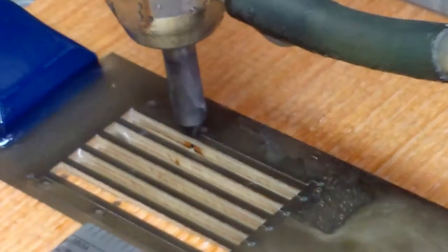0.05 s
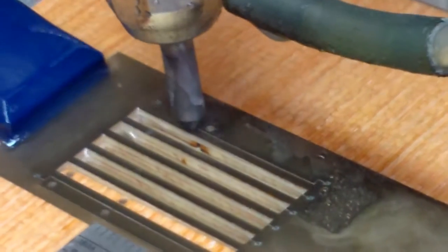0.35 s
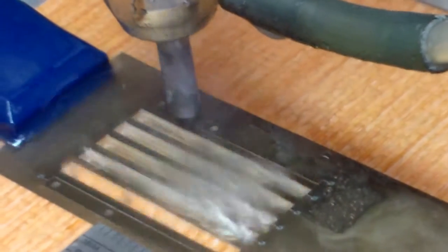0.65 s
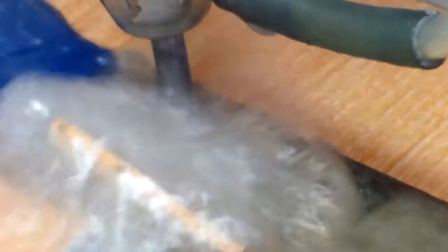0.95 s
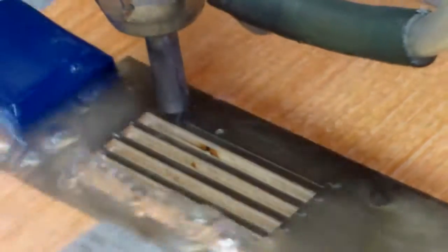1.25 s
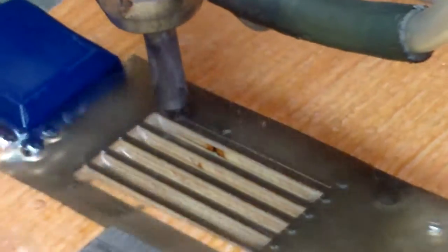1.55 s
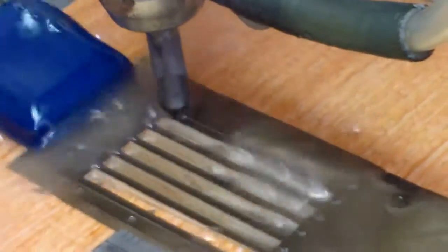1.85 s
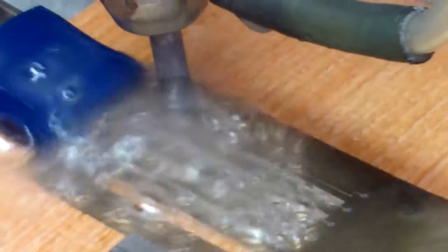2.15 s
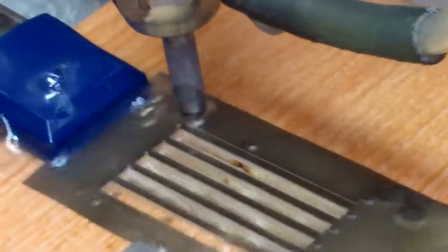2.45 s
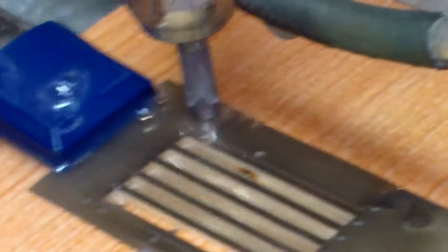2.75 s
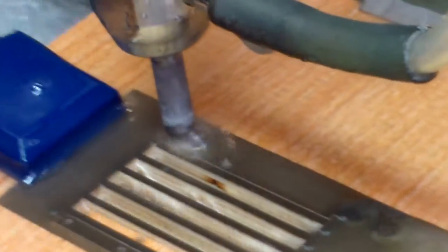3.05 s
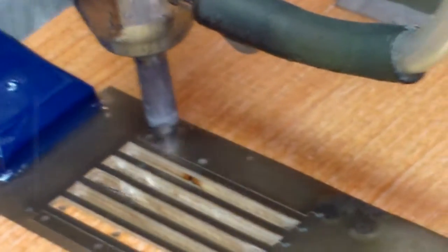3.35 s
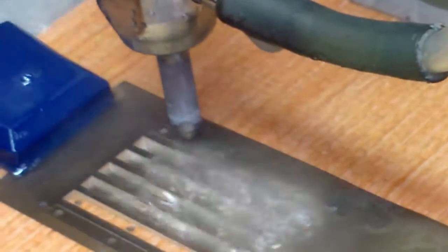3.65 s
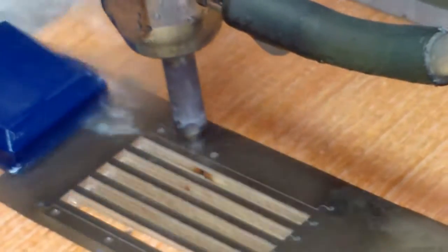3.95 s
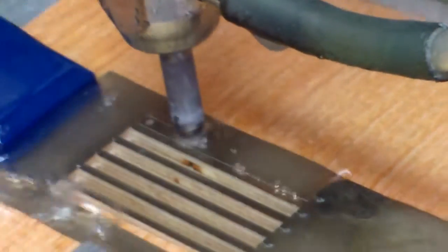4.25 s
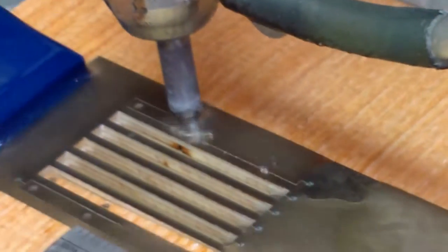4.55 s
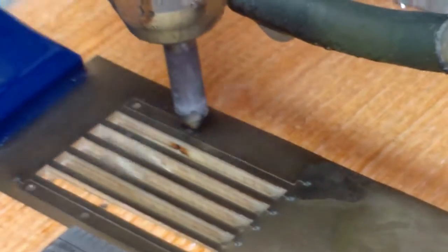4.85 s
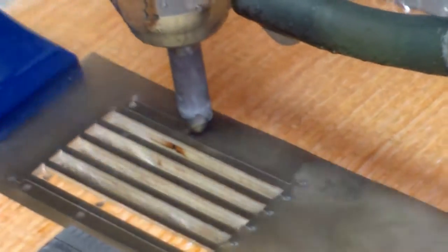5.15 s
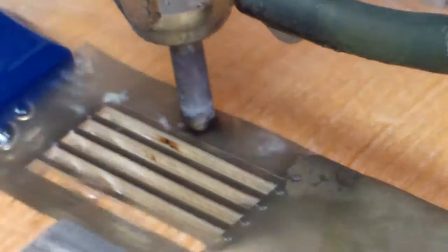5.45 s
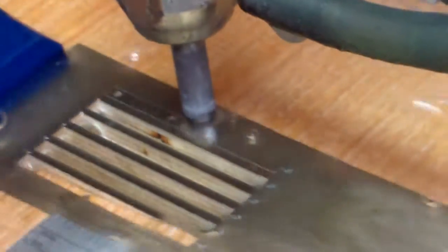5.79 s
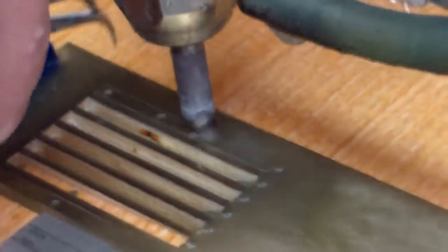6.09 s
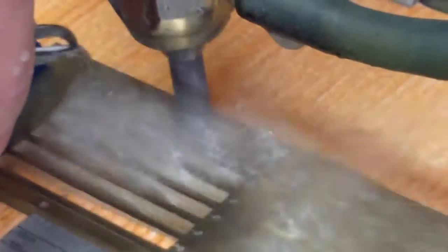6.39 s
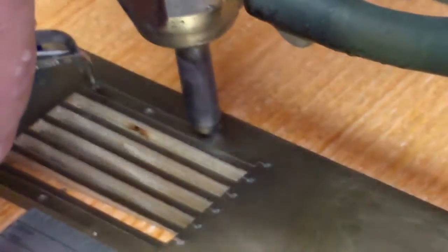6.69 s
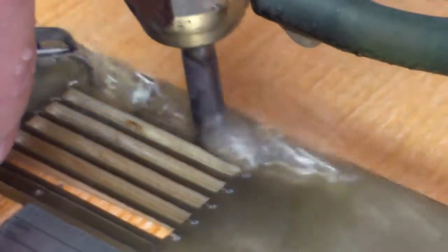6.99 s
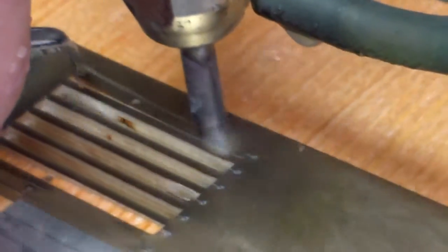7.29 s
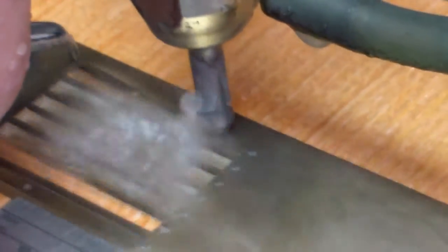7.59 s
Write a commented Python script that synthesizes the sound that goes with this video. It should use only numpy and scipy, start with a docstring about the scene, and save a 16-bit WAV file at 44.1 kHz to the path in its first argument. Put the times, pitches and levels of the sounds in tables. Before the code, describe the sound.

A water jet cuts a thin steel sheet, very close to one microphone in a workshop. From the start it gives a loud, bright hiss over pattering spray and a faint droning pump, and the overloaded microphone soon thumps and rumbles. From 0.6 seconds the hiss drops out, with shrill spits and a splash near 1 second as water washes hollowly through the slots. It returns around 1.6 seconds, then breaks off again from 1.9 to 2.5 amid spits and squirts. Whenever the jet weakens, it sounds dull and sputtery, with small glugs. A breathy falling whistle comes near 3.5 seconds. After more gaps and spits, the hiss is loudest at 4.6 seconds, with low thumps. A second whistle near 5.7 leads into a surge at 6.1. The hiss then sinks under splashing, squirts and spits before surging again at about 7.4 seconds.

```python
"""A water jet cuts slots in a thin steel sheet, close to one microphone that its hiss overloads.
From the start it hisses over pattering spray and a droning pump; the overloaded mic soon thumps.
From 0.6 s the hiss drops out over openings and spits at edges, while water squirts and glugs.
Whenever the jet is weak, water floods the cut and dulls it. The cut whistles near 3.5 s, the hiss
is loudest at 4.6 s, and after a second whistle near 5.7 s it surges twice more."""
import sys
import numpy as np
from scipy import signal
from scipy.fft import rfft, irfft, next_fast_len
from scipy.io import wavfile

SR = 44100
rng = np.random.default_rng(int(sys.argv[2]) if len(sys.argv) > 2 else 0)


def file_out(sig):
    """Save sig as 16-bit WAV at sys.argv[1]."""
    # one column per channel
    cols = np.atleast_2d(sig).T
    # limit, then scale
    lim = np.clip(cols, -1, 1)
    pcm = np.round(lim * 32767).astype(np.int16)
    wavfile.write(sys.argv[1], SR, pcm)


N = 340893
TIME = np.arange(N) / SR

# how hard the jet bites the sheet: time_s, level_db
JET_BITE = [(0, -4), (.25, 3.5), (.6, -1.5), (1.33, -7.5), (1.66, -0.5), (1.9, -6), (2.85, -6.5),
            (3.25, -3.5), (3.7, -9.5), (4.46, -6.5), (4.6, 9.5), (5.0, -11.5), (5.95, -8.5), (6.13, 3),
            (6.45, -15), (7.3, -13), (7.43, 3.5), (7.73, -1)]
# the tone of each steady noise: pitch_hz, level_db
DRY_HISS = [(100, -13.5), (1500, -17.5), (3500, -17), (5500, -14), (7500, -9.5), (10000, 0), (12000, 0.5),
            (14000, 0), (16000, -1)]  # a dry cut
WET_HISS = [(100, -22.5), (1500, -26), (3500, -10), (5000, -9.5), (6500, -3.5), (8700, 1.5), (11000, 2.5),
            (13500, 1.5), (16000, -10.5)]  # a flooded cut
DRAUGHT_TONE = [(20, 18.5), (70, -6), (300, -4.5), (1000, -24)]  # moving air
PUMP_TONE = [(25, 5), (80, 5), (200, -4), (400, 8.5), (700, -3), (1000, 0), (1300, -14), (1700, -39),
             (2500, -1), (4000, -10.5), (16000, -8)]  # the pump in the workshop
SPRAY_TONE = [(30, 0), (90, -2), (160, -1.5), (400, -4.5), (700, -5.5), (1200, -3), (1700, -3.5),
              (2600, -6), (4000, -12.5), (8000, -8), (16000, -24)]  # spray on the sheet
# pitches that the nozzle and its gap boost or weaken: pitch_hz, width_hz, gain_db
NOZZLE_BANDS = [(5860, 67, 1.5), (7190, 430, 5), (7970, 400, -2.5), (8700, 740, 10), (9156, 540, -10.5),
                (10530, 1540, 3.5), (11440, 530, -2), (12660, 470, 2)]
# pitches at which the finished slots ring: pitch_hz, width_hz, level_db
SLOT_RINGS = [(992, 98, 5.5), (1610, 130, 0.5)]
# echoes off the cutting head and table: delay_s, level_db
ECHOES = [(.0019, -31), (.0034, -28), (.0053, -38.5), (.0087, -17.5)]
# loud surges knock the overloaded microphone off centre: start_s, length_s, level_db
THUMPS = [(0.188, 0.043, -15.5), (0.415, 0.066, -28), (1.596, 0.15, -23.5), (2.342, 0.035, -16),
          (2.483, 0.083, -15), (2.979, 0.03, -13.5), (4.149, 0.044, -20), (4.525, 0.059, -8),
          (4.661, 0.027, -15), (4.752, 0.036, -16), (6.081, 0.04, -19), (6.13, 0.06, -17),
          (7.374, 0.16, -26.5)]
# the hiss drops out over an opening: start_s, length_s, depth_db
DROPOUTS = [(0.6, 0.15, 23), (0.78, 0.41, 30.5), (1.847, .61, 30.5), (3.721, 0.42, 14), (4.189, 0.076, 30),
            (4.276, 0.083, 7.5), (4.969, 0.11, 8.5), (5.328, 0.14, 11.5), (6.333, .525, 16.5),
            (7.007, 0.053, 25), (7.144, 0.022, 16), (7.663, 0.045, 18.5)]
# water runs through the slots: start_s, length_s, level_db
WASHES = [(.62, 0.14, -38.5), (.98, 0.42, -32.5), (1.91, .25, -33.5)]
# the jet catches an edge: start_s, length_s, level_db, pitch_hz
SPITS = [(.647, 0.018, -9.5, 9100), (.721, 0.048, -8, 8620), (1.187, 0.03, -9, 9110),
         (1.991, 0.034, -7, 9630), (2.105, 0.016, -22, 7300), (2.124, 0.062, -9.5, 9080),
         (2.34, 0.04, -4.5, 9400), (2.459, 0.088, -3, 9820), (2.57, 0.019, -6, 8070),
         (2.617, 0.013, -11.5, 6650), (2.68, 0.015, -11, 7100), (2.79, 0.023, -14.5, 7030),
         (4.123, 0.0086, -9.5, 6600), (4.149, 0.07, -5, 9000), (4.25, 0.0022, -19, 9200),
         (4.263, .035, -11.5, 9380), (4.315, .045, -12, 6980), (5.18, 0.021, -11.5, 7570),
         (5.376, .01, -11, 7310), (5.461, .014, -14, 6590), (5.535, .035, -14.5, 8470),
         (5.675, 0.034, -9.5, 9130), (6.694, 0.021, -8.5, 7250), (6.729, 0.021, -7.5, 7650),
         (6.776, 0.018, -12, 7330), (6.851, 0.015, -12.5, 6730), (6.872, 0.029, -11, 8260),
         (6.973, 0.01, -18, 7360), (6.995, .035, -13.5, 8100), (7.1, .03, -15, 8220),
         (7.177, 0.02, -14, 7240)]
# spray is thrown back over the sheet: start_s, length_s, level_db
SPLASHES = [(.68, 0.044, -38), (.95, 0.229, -23.5), (1.93, .17, -43), (2.31, 0.033, -27), (3.99, 0.16, -42),
            (6.49, .19, -26), (7.19, .14, -45)]
# water squirts out of the cut: start_s, length_s, level_db, pitch_hz
SQUIRTS = [(.772, 0.021, -18, 6070), (2.112, 0.054, -21, 4400), (2.625, 0.03, -24, 3300),
           (2.69, 0.05, -26, 3410), (4.085, 0.043, -24, 3000), (4.335, 0.047, -19, 4960),
           (5.05, 0.089, -27, 2355), (5.475, 0.042, -24.5, 3250), (6.533, 0.011, -20, 2130),
           (6.705, 0.024, -27, 2460), (6.785, 0.016, -23.5, 5030), (6.89, 0.031, -26, 4570)]
# air pockets glug: start_s, length_s, level_db, pitch_hz
GLUGS = [(.98, 0.052, -31, 458), (2.428, 0.015, -32, 1620), (3.59, 0.058, -37, 1190),
         (4.095, 0.028, -32, 1700), (5.075, 0.033, -30, 1340), (5.295, 0.035, -31.5, 339),
         (6.47, 0.029, -30, 374), (6.505, 0.022, -26.5, 995), (6.655, 0.011, -26, 880),
         (7.2, 0.032, -25, 341), (7.235, .1, -30.5, 380)]
# the cut whistles: start_s, length_s, level_db, pitch_hz
WHISTLES = [(3.45, 0.11, -23.5, 5050), (5.74, .28, -26, 6940)]


def from_db(db):
    """Turn decibels into a number to multiply by."""
    return 10 ** (np.asarray(db) / 20)


def unit_power(x):
    """Scale a signal so its average power is 1."""
    return x / np.sqrt(np.mean(x ** 2) + 1e-20)


def noise(tone):
    """Steady noise shaped by a tone table."""
    hz, db = np.transpose(tone)
    size = next_fast_len(N)
    pitches = np.maximum(np.fft.rfftfreq(size, 1 / SR), 1)
    gain = from_db(np.interp(np.log(pitches), np.log(hz), db))
    return unit_power(irfft(rfft(rng.standard_normal(size)) * gain, size)[:N])


def drift(rate_hz):
    """A random wobble of about size 1, mostly slower than the given rate."""
    smoothing = signal.butter(2, rate_hz, fs=SR, output="sos")
    return unit_power(signal.sosfilt(smoothing, rng.standard_normal(N + SR))[SR:])


def swells(rows, rise_s=0.019, drain_s=0.0073):
    """The strength of moving water: each row rises, holds and drains away."""
    total = np.zeros(N)
    for start, length, db in rows:
        rise = 1 - np.exp(-np.maximum(TIME - start, 0) / rise_s)
        drain = np.exp(-np.clip((TIME - start - length) / drain_s, 0, 20))
        total += from_db(db) * rise * drain
    return total


def bursts(rows, glide, width, rise_s, fade_s):
    """Sliding bands of noise and their strength; glide is end pitch / start pitch, width a share of it."""
    sound, strength = np.zeros(N), np.zeros(N)
    for start, length, db, hz in rows:
        white = rng.standard_normal((2, SR // 2))
        first = int(start * SR)
        t = TIME[:min(SR // 2, N - first)]
        smoothing = signal.butter(2, np.clip(width * hz, 10, SR / 4), fs=SR, output="sos")
        a, b = signal.sosfilt(smoothing, white)[:, :len(t)]
        pitch_hz = hz * glide ** (np.minimum(t / length, 1) - .5)
        phase = 2 * np.pi * np.cumsum(pitch_hz) / SR
        shape = from_db(db) * (1 - np.exp(-t / rise_s)) * np.exp(-np.maximum(t - length, 0) / fade_s)
        sound[first:first + len(t)] += shape * unit_power(a * np.cos(phase) + b * np.sin(phase))
        strength[first:first + len(t)] += shape
    return sound, strength


def eddies(x, depth_db, span_hz, life_s, fall_hz_per_s):
    """Brief swirls boost or weaken random pitches, sliding down at the given speed."""
    frames = dict(fs=SR, nperseg=384, noverlap=288)
    hz, times, cells = signal.stft(x, **frames)  # a grid of pitch against time
    per_hz = np.fft.fftfreq(len(hz), hz[1])[:, None]
    per_s = np.fft.fftfreq(len(times), times[1])
    blur = np.exp(-(per_hz * span_hz) ** 2 - ((per_s - fall_hz_per_s * per_hz) * life_s) ** 2)
    swirls = unit_power(np.fft.ifft2(np.fft.fft2(rng.standard_normal(cells.shape)) * blur).real)
    gain = unit_power(from_db(depth_db * np.clip(swirls, -2, 2)))
    return signal.istft(cells * gain, **frames)[1][:N]


def sputter(rate_hz, fade_s, spread_db):
    """Blobs of water hit at random, each a sharp jump in strength that quickly fades."""
    hits = rng.random(N) < rate_hz / SR
    sizes = from_db(spread_db * np.clip(rng.standard_normal(N), -2, 2))
    return unit_power(signal.lfilter([1], [1, -np.exp(-1 / (fade_s * SR))], hits * sizes + 1e-18))


def bite(fall_s=0.031, return_s=0.035):
    """The jet's level in dB: it fades quickly over each opening and comes back about as quickly."""
    db = np.interp(TIME, *np.transpose(JET_BITE))
    for start, length, depth_db in DROPOUTS:
        entering = np.clip((TIME - start) / fall_s, 0, 1)
        leaving = np.clip((start + length - TIME) / return_s + 1, 0, 1)
        db -= depth_db * entering * leaving
    return db


def jet(bite_db, splash, max_flood=0.6, half_flood_db=-6.5):
    """A dry cut hisses bright and even; a weak jet lets it flood, so it dulls, surges and sputters."""
    flood = np.clip(max_flood / (1 + np.exp(bite_db - half_flood_db)), 0.01, 1)
    dry = eddies(noise(DRY_HISS), depth_db=4, span_hz=547, life_s=0.033, fall_hz_per_s=1900)
    wet = eddies(noise(WET_HISS), depth_db=4, span_hz=500, life_s=0.022, fall_hz_per_s=12000)
    wet *= unit_power(1.3 + sputter(rate_hz=130, fade_s=0.004, spread_db=3))
    flutter = from_db((0.12 + flood) * drift(120) + 2.9 * flood * drift(9.3))
    hiss = from_db(bite_db - 1) * (np.sqrt(1 - flood) * dry + np.sqrt(flood) * wet)
    singing = from_db(1.76 * bite_db - 6.5) * np.sqrt(flood) * sizzle()
    splash_fizz = from_db(-9) * splash * wet
    return flutter * (hiss + singing + splash_fizz)


def sizzle(pitch_hz=6190, wander_octaves=0.14, wander_hz=10, width_hz=350, surge_db=3):
    """The water-filled gap sings with a wandering pitch and strength."""
    phase = 2 * np.pi * np.cumsum(pitch_hz * 2 ** (wander_octaves * drift(wander_hz))) / SR
    band = drift(width_hz) * np.cos(phase) + drift(width_hz) * np.sin(phase)
    return unit_power(band * from_db(surge_db * drift(wander_hz)))


def nozzle(x):
    """The gap between nozzle and sheet boosts some pitches and weakens others."""
    for hz, width_hz, db in NOZZLE_BANDS:
        gain = from_db(db / 2)
        tuning = -2 * np.cos(2 * np.pi * hz / SR)
        width = np.tan(np.pi * width_hz / SR)
        x = signal.lfilter([1 + width * gain, tuning, 1 - width * gain],
                           [1 + width / gain, tuning, 1 - width / gain], x)
    return x


def draught(bite_db, growth=3.4, full_at_db=2.5):
    """Air dragged along by the jet rumbles, growing much faster than the hiss, up to a limit."""
    return from_db(growth * np.minimum(bite_db, full_at_db) - 25.5) * noise(DRAUGHT_TONE)


def pump(level_db=-39.5):
    """The pump drones steadily in the workshop behind."""
    return from_db(level_db) * noise(PUMP_TONE)


def spray(splash, patter_db=-36):
    """Spray patters on the sheet all the time, harder with each splash."""
    rush = eddies(noise(SPRAY_TONE), depth_db=2.5, span_hz=300, life_s=0.013, fall_hz_per_s=0)
    drops = unit_power(1 + sputter(rate_hz=360, fade_s=0.011, spread_db=12))
    return (from_db(patter_db) + splash) * rush * drops


def slots(trickle_db=-44.5):
    """The finished slots ring hollow as water trickles or washes through."""
    flow = rng.standard_normal(N)
    ring = np.zeros(N)
    for hz, width_hz, db in SLOT_RINGS:
        band = signal.iirpeak(hz, hz / width_hz, fs=SR)
        ring += from_db(db) * unit_power(signal.lfilter(*band, flow))
    return (from_db(trickle_db) + swells(WASHES)) * unit_power(ring)


def room(x, tail_db=-15.5, tail_s=0.16):
    """Nearby surfaces add quick echoes; the workshop adds a faint tail."""
    response = rng.standard_normal(SR // 2) * from_db(-60 * TIME[:SR // 2] / tail_s)
    response *= from_db(tail_db) / np.linalg.norm(response)
    response[0] = 1  # the direct sound
    for delay, db in ECHOES:
        response[int(delay * SR)] += from_db(db)
    return signal.fftconvolve(x, response)[:N]


def overload(x, ceiling=0.69, lopsided=0.064, oversample=3):
    """The microphone squashes peaks unevenly, so loud hiss spills down into a low roar."""
    squashed = np.tanh(signal.resample_poly(x, oversample, 1) / ceiling)
    low_cut = signal.butter(1, 25, "high", fs=SR * oversample, output="sos")
    roar = signal.sosfilt(low_cut, squashed ** 2)
    return signal.resample_poly(ceiling * (squashed - lopsided * roar), 1, oversample)


def thumps(rise_s=0.0018, recover_hz=0.5, rumble=0.26):
    """Low thumps at listed times: the overloaded mic is knocked off centre and swings slowly back."""
    shift = np.zeros(N)
    for start, length, db in THUMPS:
        age = np.maximum(TIME - start, 0)
        shift += from_db(db) * (1 - np.exp(-age / rise_s)) * np.exp(-np.minimum(age / length, 6) ** 2)
    recovery = signal.butter(1, recover_hz, "high", fs=SR, output="sos")
    return signal.sosfilt(recovery, -shift * (1 + rumble * drift(204)))


def spits():
    """At an edge the jet gives a hissy shriek that slides down as the gap opens."""
    shriek, strength = bursts(SPITS, glide=0.81, width=0.21, rise_s=0.00019, fade_s=0.0047)
    spit = shriek + from_db(-2.5) * strength * noise(DRY_HISS)
    spit = eddies(spit, depth_db=7, span_hz=650, life_s=0.024, fall_hz_per_s=67000)
    return spit * from_db(2.6 * drift(240))


def squirts():
    """Water squirts raggedly out of the cut, falling in pitch."""
    sound, _ = bursts(SQUIRTS, glide=0.76, width=0.17, rise_s=0.0022, fade_s=0.0085)
    return sound * from_db(1.5 * drift(130))


def glugs():
    """Pockets of air glug briefly in the water."""
    return bursts(GLUGS, glide=0.993, width=0.2, rise_s=0.0016, fade_s=0.0046)[0]


def whistles():
    """Air sings in the narrow cut, a breathy note that slides down as the water moves."""
    return bursts(WHISTLES, glide=0.57, width=0.14, rise_s=0.02, fade_s=0.022)[0]


def scene():
    """The cut and its water over the drone of the pump, alike in both channels."""
    bite_db, splash = bite(), swells(SPLASHES)
    cut = nozzle(jet(bite_db, splash) + spits()) + whistles()
    water = spray(splash) + slots() + squirts() + glugs()
    mono = room(cut + water) + draught(bite_db) + pump()
    return np.stack([mono, mono])


def record(dry):
    """One overloaded, thumping microphone feeds both channels; the top treble is cut."""
    limit, cutoff_hz = 0.92, 15750
    mono = np.clip(overload(dry.mean(axis=0)) + thumps(), -limit, limit)
    mono = signal.sosfiltfilt(signal.ellip(12, .1, 70, cutoff_hz, fs=SR, output="sos"), mono)
    return np.stack([mono, mono])


dry = scene()
out = record(dry)
file_out(out)
```